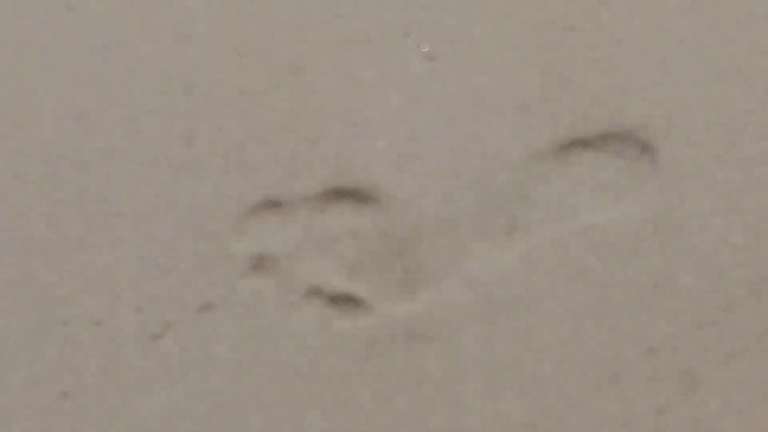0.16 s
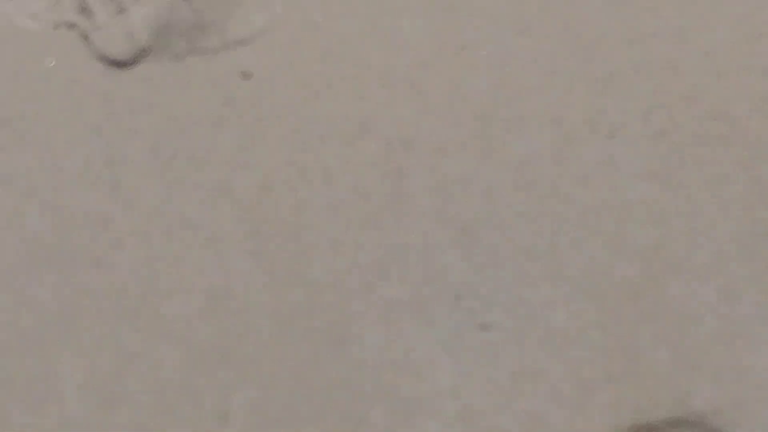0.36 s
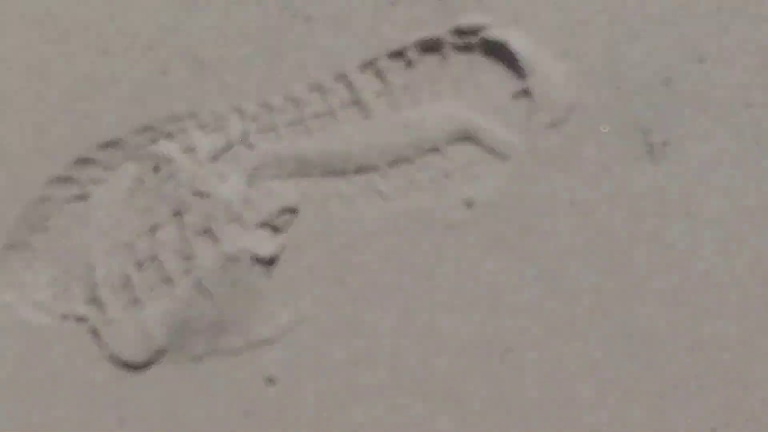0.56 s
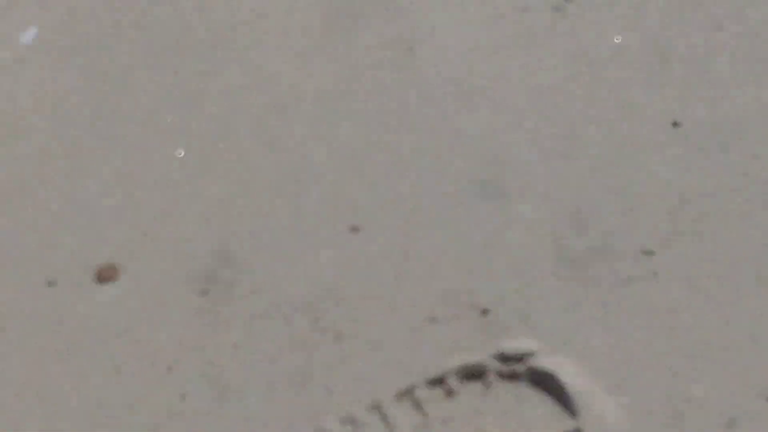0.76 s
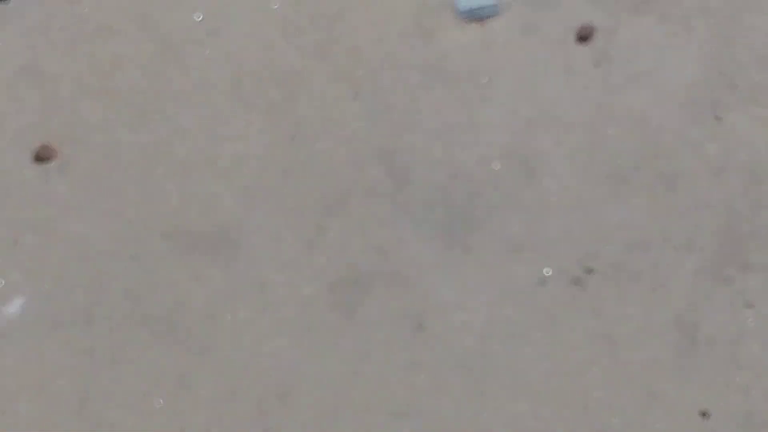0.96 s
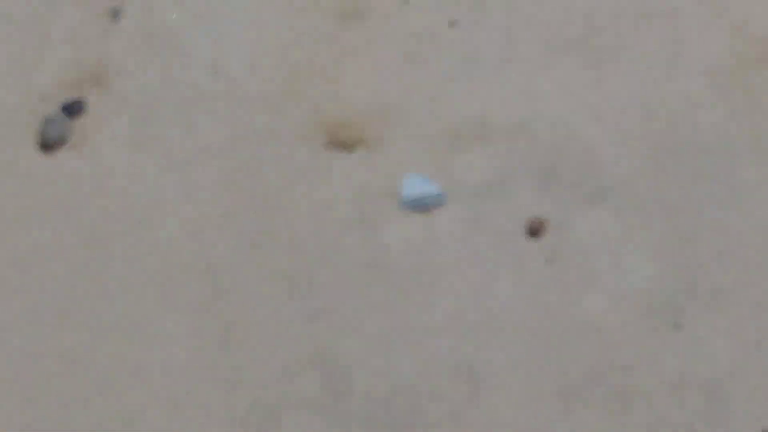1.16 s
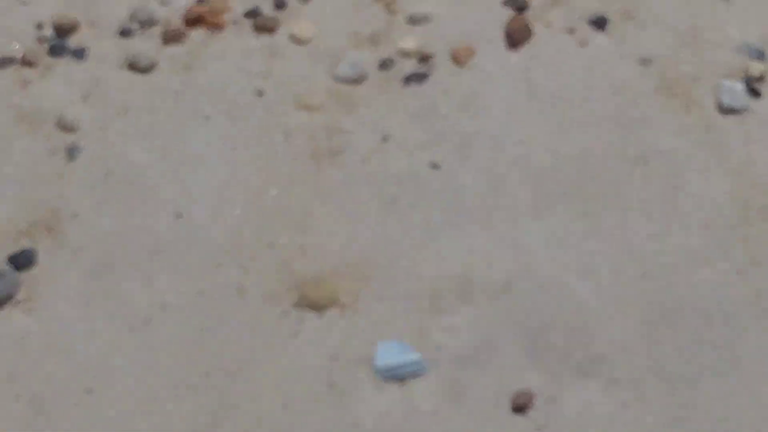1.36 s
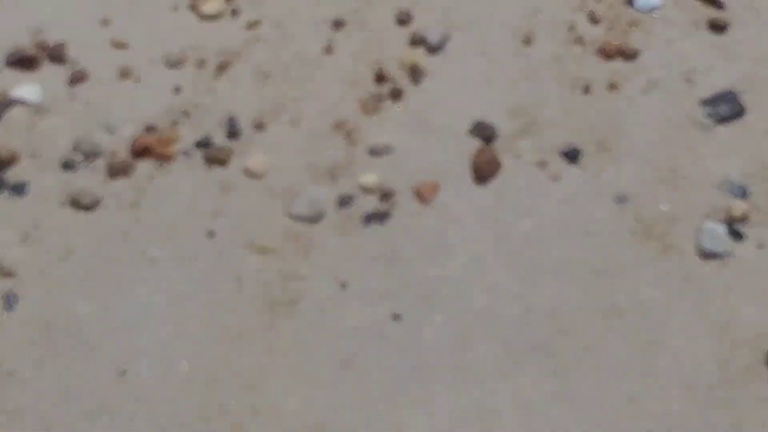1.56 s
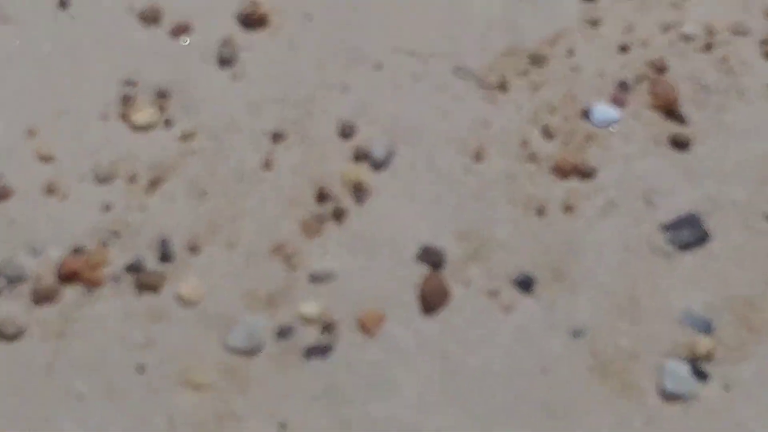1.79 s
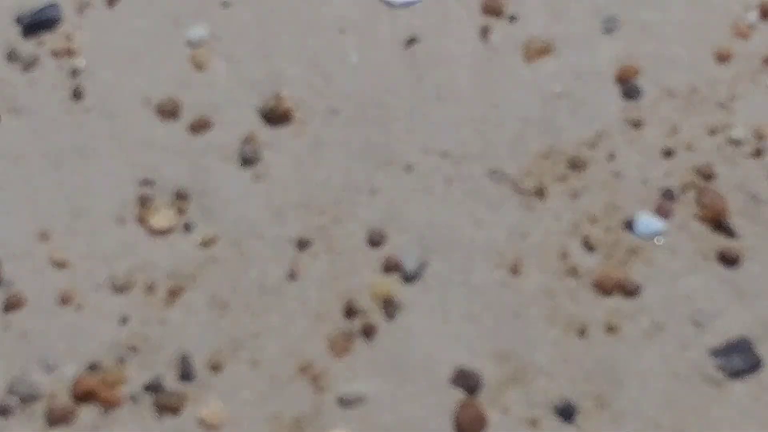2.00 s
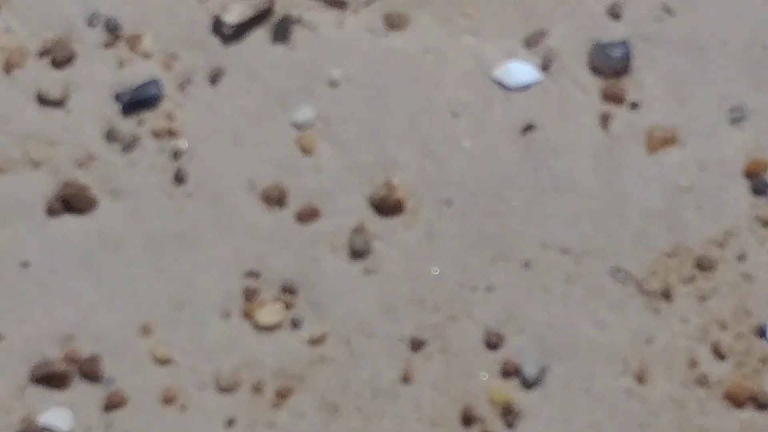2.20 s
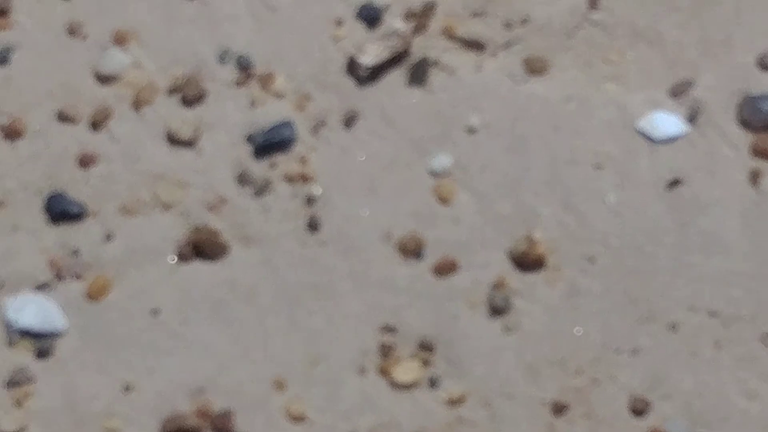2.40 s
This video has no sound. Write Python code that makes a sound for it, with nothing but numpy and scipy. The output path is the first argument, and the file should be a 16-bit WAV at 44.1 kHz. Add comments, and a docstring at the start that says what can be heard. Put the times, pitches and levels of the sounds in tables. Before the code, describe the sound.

Wind thumps on a small handheld microphone dominate, low and irregular, mostly on the right. Quiet sandy scuffs open the first 0.2 seconds; a foot drags softly from 0.3 to 0.9, strongest near 0.6. Wind flutters densely around 0.9-1.2, with some left-side thumps, and knocks hard near 1.65. Faint scuffs follow at 1.25-1.55, a crisp gritty step near 1.96, and a last heavy gust at 2.4. Distant surf and hiss continue.

```python
"""A windy walk on the beach

Someone walks on sand holding a small camera in a breeze. Wind eddies thump its two microphone
ports, mostly the right: each is a short low ring, over a lumpy low noise.
Shoes scuff and drag in the sand over a swelling rustle, and far surf and microphone hiss share
one background layer. These hisses are random noise, shaped over frequency and time.
"""
import sys
import numpy as np
from scipy import signal
from scipy.fft import rfft, irfft
from scipy.io import wavfile
from scipy.ndimage import uniform_filter1d

SR = 44100
rng = np.random.default_rng(int(sys.argv[2]) if len(sys.argv) > 2 else 0)


def wav_record(signal):
    """Record a signal, one row per channel, as 16-bit PCM in the file named by sys.argv[1]."""
    frames = np.transpose(np.atleast_2d(signal))
    bounded = np.clip(frames, -1, 1)
    # unit amplitude maps onto the largest positive 16-bit level
    quanta = np.round(bounded * 32767).astype(np.int16)
    wavfile.write(sys.argv[1], SR, quanta)


N = 107604  # length in samples

# Colour of the far surf and microphone hiss. Each row: frequency in Hz, level in dB.
SURF_COLOUR = [(150, -6.5), (300, 3), (600, -0.5), (1000, -7.5), (1400, -11.5), (2300, -13.5),
               (3300, -17.5), (4600, -23), (5900, -17.5), (7100, -27), (8500, -20.5), (10400, -30),
               (12000, -25.5), (15600, -25.5)]
# Swells of the surf's low roar. Each row: time in seconds, added level in dB.
SURF_ROAR = [(0, -2), (.15, 4), (.3, -3.5), (.5, 8.5), (.75, 5.5), (1.0, 4), (1.3, 6), (1.6, 1.5), (1.9, 1),
             (2.0, 7), (2.2, -0.5), (2.44, 5)]
# Loudness of the rustle of sand and clothes. Each row: time in seconds, level in dB.
RUSTLE_LEVEL = [(0.0, -71), (0.05, -53.5), (0.18, -62), (0.41, -56), (0.61, -51.5), (0.69, -54.5),
                (0.84, -56), (1.05, -59.5), (1.43, -62.5), (1.55, -63.5), (1.65, -69.5), (1.88, -65.5),
                (1.96, -50.5), (2.11, -60), (2.44, -54.5)]
# Colour of that rustle. Each row: frequency in Hz, level in dB.
RUSTLE_COLOUR = [(300, -16), (600, 1), (900, -15), (1200, -12), (1950, -13), (2400, -16.5), (3400, -17),
                 (4800, -22.5), (7200, -26), (8600, -23), (9700, -25.5), (10500, -53), (15600, -46)]
# A foot dragging through sand. Each row: time in seconds, level in dB, scrape pitch in Hz.
FOOT_DRAG = [(.3, -82, 1850), (.4, -65.5, 1790), (.5, -58.5, 1640), (.58, -57.5, 1920), (.67, -68, 1820),
             (.74, -58.5, 1990), (.84, -68, 1930), (.9, -78, 1800)]
# Shoe scuffs. Each row: peak time in seconds, rise in seconds, fall in seconds, level in dB,
# then boosts on top of it: low body in dB, scrape pitch in Hz, scrape in dB,
# grit near 8 kHz in dB, top treble in dB.
SHOE_SCUFFS = [(0.013, 0.03, 0.019, -53, 10.5, 1820, 5, -0.5, 7),
               (.08, 0.03, 0.054, -58.5, 2, 3220, 6.5, -9, 11),
               (0.184, 0.019, 0.013, -51.5, -11, 2380, 12, 7, 14.5),
               (.6, 0.025, 0.093, -54.5, 13, 1800, 4, -3, 0),
               (0.612, 0.014, 0.016, -49.5, 4, 2100, 12.5, -5, -3),
               (0.849, 0.034, 0.021, -57, -3, 1920, 3, 4.5, 0),
               (1.11, 0.023, 0.03, -69, -21, 2500, -12, 11, 14),
               (1.237, 0.0034, 0.016, -58, -2.5, 1150, 14, 2, 8),
               (1.274, 0.022, 0.03, -54.5, 7, 2650, 5.5, 3, 10),
               (1.41, 0.062, 0.03, -59, -7, 4100, 8.5, 3, 3),
               (1.475, 0.017, 0.022, -60, -1, 2340, 9, 1.5, 0),
               (1.54, 0.026, 0.019, -59.5, 0, 3760, 9.5, 1.5, 3),
               (1.697, .006, 0.0051, -65, -14, 3300, 14.5, -14, -13),
               (1.923, 0.0022, 0.0037, -53, -4, 2500, 5, -15, -10),
               (1.942, 0.011, 0.018, -52, -2, 2380, 11.5, -8, -2),
               (1.963, 0.013, 0.012, -46.5, -13, 2900, 4.5, -3, -19),
               (1.958, 0.012, .018, -51.5, -10, 5340, 5, 2, -19),
               (1.973, .002, 0.0035, -47, -10, 2100, 1, 0, -16),
               (1.996, 0.0086, 0.016, -48.5, -18, 2200, -3, 4.5, -23),
               (2.07, 0.037, 0.068, -59, -3, 2140, 5, 1, 6),
               (2.401, 0.055, 0.025, -60.5, -6, 3130, 12.5, 6, -4)]
# Colour shared by all scuffs before their own boosts. Each row: frequency in Hz, level in dB.
SCUFF_COLOUR = [(400, -2.5), (700, -16), (1000, 1.5), (1500, 0.5), (2300, -5.5), (3300, -7.5), (4300, -13),
                (5400, -9.5), (7000, -17.5), (8200, -11), (9600, -17), (10400, -37), (11600, -25),
                (14000, -30), (15600, -34)]
# How the two ports hear the hisses. Each row: frequency in Hz, likeness from 0 to 1,
# lead of the left port in radians, left minus right level in dB.
PORT_PAIR = [(300, .3, 0, -1), (700, .45, 1.6, -1), (1100, .45, 3.2, .5), (1450, .45, 3.4, .5),
             (1750, .55, 5.2, .3), (2100, .9, 5.6, .3), (2700, .55, 6, .3), (3300, .3, 8, 1),
             (3800, .5, 10.2, 1.2), (5000, .4, 13.5, 1.2), (6000, .35, 16.2, 1.2), (9000, .2, 26, 1.1),
             (15000, .05, 28, -.6)]
# Colour of the steady wind buffeting. Each row: frequency in Hz, level in dB.
BUFFET_COLOUR = [(20, -58), (35, -23), (55, 4), (80, 1), (125, -6), (160, -10), (190, -8.5), (240, -26),
                 (300, -24.5), (500, -30.5), (1000, -66.5)]
# Loudness of the buffeting at the left port. Each row: time in seconds, level in dB.
LEFT_BUFFET = [(0, -47), (.27, -46), (.33, -53), (.42, -47), (.84, -46), (1.0, -43), (1.22, -43),
               (1.3, -48), (1.4, -44), (1.75, -46), (1.95, -48), (2.07, -44), (2.17, -50), (2.35, -46),
               (2.44, -48)]
# Loudness of the buffeting at the right port. Each row: time in seconds, level in dB.
RIGHT_BUFFET = [(0, -44.5), (.15, -43), (.3, -47.5), (.45, -37.5), (.58, -39), (.84, -39), (1.0, -31),
                (1.2, -42), (1.3, -39.5), (1.55, -40), (1.66, -42), (1.71, -47), (1.8, -41.5),
                (1.87, -39.5), (1.98, -35.5), (2.08, -46), (2.13, -46.5), (2.22, -43.5), (2.44, -46)]
# Eddies hitting a port. Each row: peak time in seconds, level in dB, pitch at the peak in Hz,
# length in seconds, sharp front in dB relative to the eddy, port (0 left, 1 right).
EDDIES = [(0.068, -27, 75, 0.023, -11, 1), (0.101, -32, 63, 0.014, -6, 1), (0.234, -35, 66, 0.021, -30, 1),
          (0.376, -25, 83, 0.013, -14.5, 1), (0.392, -25, 73, 0.018, -34, 1),
          (0.455, -21, 72, 0.018, -23, 1), (0.485, -26, 69, 0.011, -26, 1),
          (0.626, -18.5, 69.4, 0.024, -15.5, 1), (0.676, -26.5, 65, 0.026, -18, 1),
          (0.728, -32.1, 81, 0.01, -21, 1), (0.768, -20.5, 70, 0.022, -36, 1),
          (0.803, -28, 79, 0.013, -39, 1), (0.874, -23, 90, 0.012, -33, 1), (0.878, -34, 86, 0.026, -19, 0),
          (0.912, -33.5, 72, 0.039, -15, 0), (0.931, -14.5, 93.4, 0.012, -9, 1),
          (0.948, -28, 80, 0.016, -12, 0), (0.949, -15.5, 66, 0.025, -26, 1),
          (0.972, -26.5, 111, 0.012, -18, 1), (0.996, -17, 90.4, 0.012, -38, 1),
          (1.015, -20, 89.2, 0.017, -16, 1), (1.016, -35.5, 213, 0.0074, -18, 1),
          (1.042, -32.5, 190, 0.0078, -20, 1), (1.054, -24, 85.0, 0.019, -20, 1),
          (1.075, -29.5, 61.7, 0.03, -13, 0), (1.118, -18, 75, 0.0274, -9, 0),
          (1.136, -22, 68, 0.017, -32, 1), (1.16, -24, 78, 0.024, -16, 1),
          (1.187, -24, 104.5, 0.018, -11, 0), (1.222, -23, 66, 0.011, -39, 1),
          (1.263, -26, 78.0, 0.013, -35, 1), (1.343, -22, 77, 0.024, -27, 1),
          (1.385, -25.5, 62, 0.01, -23, 1), (1.412, -34, 66, 0.015, -6, 1),
          (1.496, -24, 62.6, 0.015, -9, 1), (1.518, -24, 65.4, 0.019, -26, 1),
          (1.532, -21.5, 64.6, 0.011, -37, 1), (1.605, -22.5, 108.6, 0.014, -30, 1),
          (1.641, -13.5, 118, 0.016, -4, 1), (1.648, -27.5, 260, 0.00616, -17, 1),
          (1.67, -25, 74.5, 0.016, -17, 1), (1.67, -30, 80, 0.016, -18, 0),
          (1.746, -20.5, 77.3, 0.024, -6, 1), (1.765, -30, 169.5, 0.01, -10, 1),
          (1.781, -38, 72, 0.012, -17, 1), (1.932, -24, 80.5, 0.014, -10, 1),
          (1.945, -32, 132, 0.011, -21, 1), (1.955, -19, 146.2, 0.012, 1.5, 1),
          (1.959, -23.5, 244, 0.0052, -31, 1), (1.979, -27.5, 110, 0.021, 0, 1),
          (2.019, -31.5, 105.0, 0.0134, -27, 1), (2.037, -28, 62.4, 0.0335, -36, 1),
          (2.173, -26.5, 94.5, 0.0182, -12, 1), (2.254, -34, 237, 0.0065, -5, 1),
          (2.259, -19.5, 84.7, 0.014, -24, 1), (2.27, -18, 70.3, 0.019, -10, 1),
          (2.319, -25, 74, 0.012, -42, 1), (2.365, -26.5, 122, 0.011, -21, 1),
          (2.381, -13, 84, 0.016, -32, 1)]

SURF_DB = -58
DRAG_WIDTH = 0.16  # width of a drag band, in natural-log frequency
DRAG_UPPER, DRAG_UPPER_DB = 2.74, -14  # second band: frequency ratio, strength in dB
SCRAPE_WIDTH = 0.15  # width of a scuff's scrape boost, in natural-log frequency
RISE_EDGE, FALL_EDGE = 2, 1.87  # steepness of a scuff's start and end
HOP = 64  # samples from one noise frame to the next
PUFF_RISE, PUFF_END = 0.3006, 2.35  # rise and final fade, as shares of an eddy's length
PUFF_SAG, FRONT_HZ = 0.39, 186.3  # sag in natural-log pitch, pitch of the sharp front
LOW_CUT_HZ, EDGE_HZ = 32, 15730  # range of the camera sound


def gain_of(db):
    """Turns decibels into a gain."""
    return 10 ** (np.asarray(db) / 20)


def evened(x):
    """Scales a signal to an rms of 1."""
    return x / np.sqrt(np.mean(abs(x) ** 2) + 1e-20)


def read(points, hz, order=1):
    """Reads one column of a frequency table, blending between rows by log frequency."""
    p = np.array(points)
    return np.interp(np.log(hz + 1), np.log(p[:, 0] + 1), p[:, order])


def curve(points, t, order=1):
    """Reads one column of a time table, blending between rows."""
    p = np.array(points)
    return np.interp(t, p[:, 0], p[:, order])


def shape(points, hz):
    """Turns a colour table into a column of gains with an rms of 1."""
    return evened(gain_of(read(points, hz)))[:, None]


def bump(hz, centre, width):
    """A smooth hill around one frequency, its width in natural-log frequency."""
    return np.exp(-(np.log(hz / centre + 1e-9) / width) ** 2)


def surf(hz, t, patches):
    """Size of the surf and hiss: a steady colour, a swelling low roar and slow patches."""
    roar = curve(SURF_ROAR, t) / (1 + (hz[:, None] / 1000) ** 4)
    return shape(SURF_COLOUR, hz) * gain_of(SURF_DB + roar + 1.46 * patches)


def rustle(hz, t, patches):
    """Size of the rustle: a fixed colour that swells with sand and clothes moving."""
    return shape(RUSTLE_COLOUR, hz) * gain_of(curve(RUSTLE_LEVEL, t) + 0.45 * patches)


def drag(hz, t):
    """Power of a foot grinding through sand, in two bands that glide together."""
    scrape_hz = curve(FOOT_DRAG, t, order=2)
    away = np.log(hz[:, None] / scrape_hz + 1e-9)
    lower = np.exp(-(away / DRAG_WIDTH) ** 2)
    upper = np.exp(-((away - np.log(DRAG_UPPER)) / DRAG_WIDTH) ** 2)
    bands = lower + gain_of(DRAG_UPPER_DB) * upper
    return (evened(bands) * gain_of(curve(FOOT_DRAG, t))) ** 2


def scuffs(hz, t):
    """Power of shoes pushing sand: short bursts, each with its own scrape, grit and body."""
    low = 1 / (1 + (hz / 1300) ** 4)
    grit = bump(hz, 8200, 0.35)
    top = 1 / (1 + (11000 / (hz + 1)) ** 8)
    power = 0
    for s, rise, fall, db, low_db, scrape_hz, scrape_db, grit_db, top_db in SHOE_SCUFFS:
        time_scale = np.where(t < s, rise, fall)
        steepness = np.where(t < s, RISE_EDGE, FALL_EDGE)
        swell = np.exp(-abs((t - s) / time_scale) ** steepness)
        scrape = bump(hz, scrape_hz, SCRAPE_WIDTH)
        boosts = low_db * low + scrape_db * scrape + grit_db * grit + top_db * top
        colour = gain_of(db + boosts)[:, None]
        power = power + (shape(SCUFF_COLOUR, hz) * colour) ** 2 * swell
    return power


def at_ports(size, hz, noises):
    """Gives the ports partly alike noise, with a lead and level difference at each pitch."""
    a, b, c, d = noises
    likeness = np.clip(read(PORT_PAIR, hz), 0, 1)[:, None]
    lead = np.exp(1j * read(PORT_PAIR, hz, order=2))[:, None]
    right = a + 1j * b
    left = likeness * right * lead + np.sqrt(1 - likeness ** 2) * (c + 1j * d)
    tilt = gain_of(read(PORT_PAIR, hz, order=3) / 2)[:, None]  # half the difference to each port
    return np.array([left * tilt, right / tilt]) * size


def hisses():
    """Builds surf, rustle, drag and scuffs from random short-time spectra with grainy flicker."""
    frames, hz = N // HOP + 5, np.fft.rfftfreq(4 * HOP, 1 / SR)
    t = np.arange(frames) * HOP / SR
    # Axis 0 is frequency and axis 1 is time.
    *noises, grain = rng.standard_normal((frames, len(hz), 5)).T
    flicker = evened(uniform_filter1d(grain, size=25, axis=0))  # broad in pitch, very brief
    specks = evened(uniform_filter1d(grain, size=14, axis=1))  # narrow, about 20 ms long
    patches = uniform_filter1d(uniform_filter1d(grain, size=5, axis=0), size=40, axis=1)
    patches = evened(patches)
    walk_power = scuffs(hz, t) + drag(hz, t) + rustle(hz, t, patches) ** 2
    walk_power = walk_power * gain_of(3.56 * flicker)
    size = np.sqrt(walk_power + surf(hz, t, patches) ** 2) * gain_of(1.12 * specks)
    spectra = at_ports(size, hz, noises)
    sound = signal.istft(spectra, nperseg=4 * HOP, noverlap=3 * HOP)[1]
    return sound[:, :N] / np.sqrt(len(hz))


def buffet():
    """Steady wind on the ports: lumpy low noise, unrelated from left to right."""
    t, hz = np.arange(N) / SR, np.fft.rfftfreq(N, 1 / SR)
    noise, lumps = rng.standard_normal((2, 2, N))
    lumps = evened(uniform_filter1d(uniform_filter1d(lumps, size=900), size=900))
    lumpy = noise * gain_of(1.53 * lumps)
    low = evened(irfft(rfft(lumpy) * gain_of(read(BUFFET_COLOUR, hz)), N))
    return low * gain_of([curve(LEFT_BUFFET, t), curve(RIGHT_BUFFET, t)])


def puffs():
    """Each eddy is a quick push with a sharp front, ringing a few cycles at sagging pitch."""
    out = np.zeros((2, N + SR))
    for s, db, hz, length, edge_db, port in EDDIES:
        # Time from the peak, counted in eddy lengths.
        u = np.arange(-3 * PUFF_RISE * length, 3 * length, 1 / SR) / length
        rise = np.exp(-(u / PUFF_RISE) ** 2)
        fall = np.exp(-(abs(u) / 0.82) ** 0.89 - (u / PUFF_END) ** 4)
        swell = np.where(u < 0, rise, fall)
        turns = np.cumsum(hz * np.exp(-PUFF_SAG * np.tanh(u))) / SR
        ring = swell * np.cos(2 * np.pi * turns)
        sharp = 0.0032 * gain_of(-0.2 * (db + edge_db + 31))  # seconds; harder fronts are shorter
        front_swell = np.exp(-((u + 0.24) * length / sharp) ** 2)
        front_wave = np.cos(2 * np.pi * FRONT_HZ * (u + 0.26) * length)
        front = -gain_of(edge_db) * front_swell * front_wave
        at = max(round(s * SR + u[0] * length * SR), 0)
        out[int(port > .5), at:at + len(u)] += gain_of(db) * (ring + front)
    return out[:, :N] + .02 * out[::-1, :N]  # a little reaches the other port


def scene():
    """Adds the sounds of the walk and the wind on the ports."""
    return hisses() + buffet() + puffs()


def record(dry):
    """Low cut of the microphone, then the treble limit of the recorder."""
    low_cut = signal.butter(3, LOW_CUT_HZ, "high", fs=SR, output="sos")
    cut = signal.sosfilt(low_cut, dry)
    treble_limit = signal.firwin(1023, EDGE_HZ, window=("kaiser", 10), fs=SR)
    return signal.oaconvolve(cut, treble_limit[None], "same")


dry = scene()
out = record(dry)
wav_record(out)
```